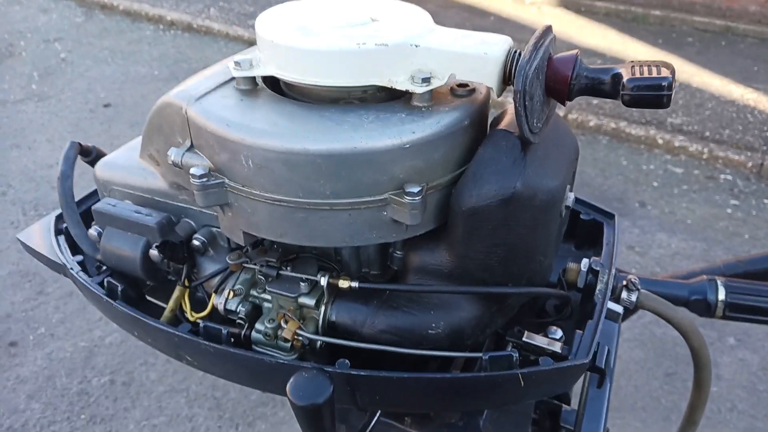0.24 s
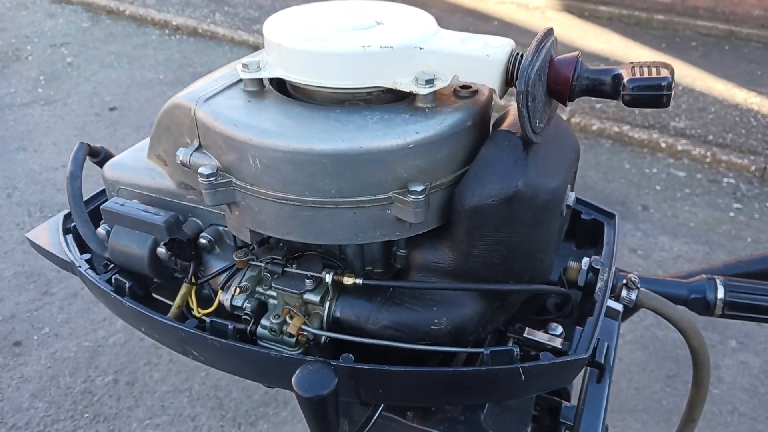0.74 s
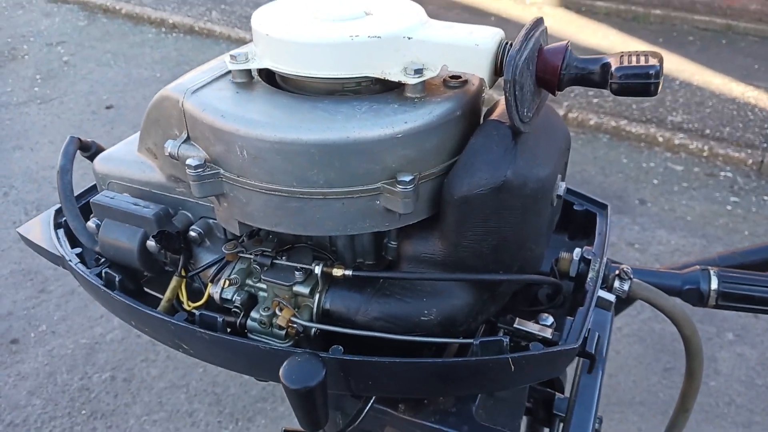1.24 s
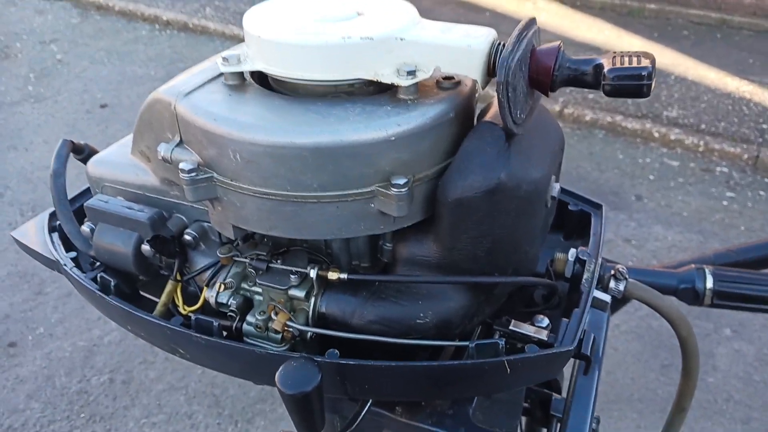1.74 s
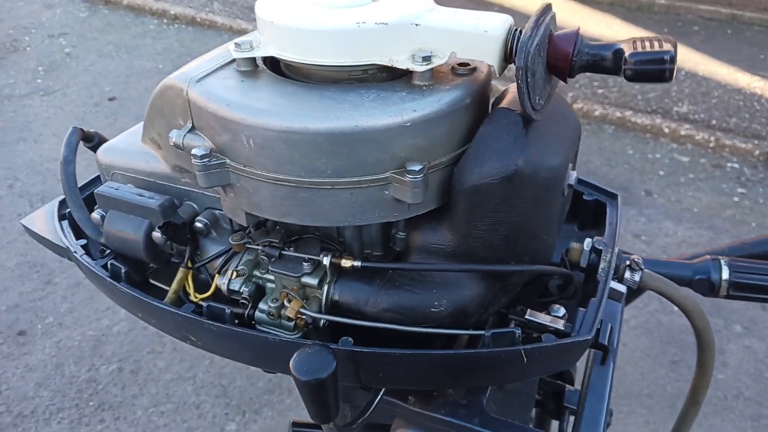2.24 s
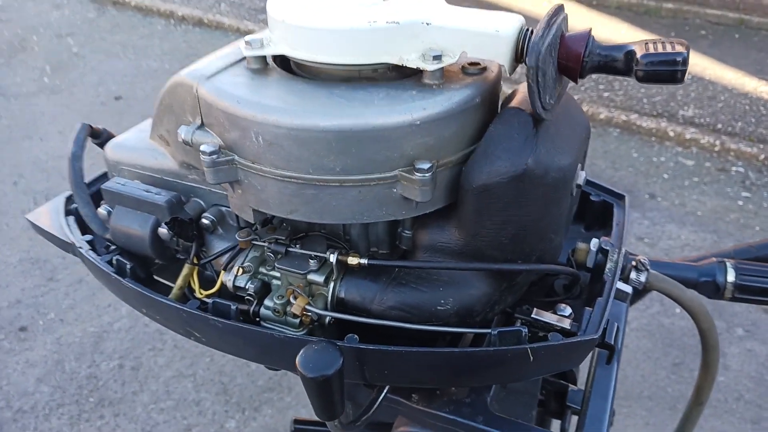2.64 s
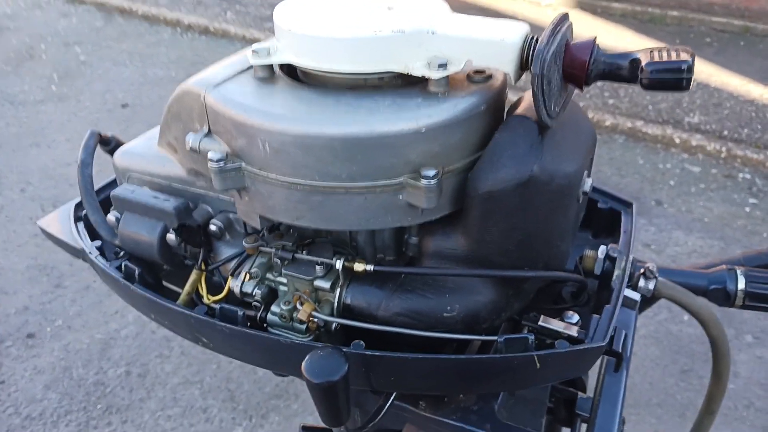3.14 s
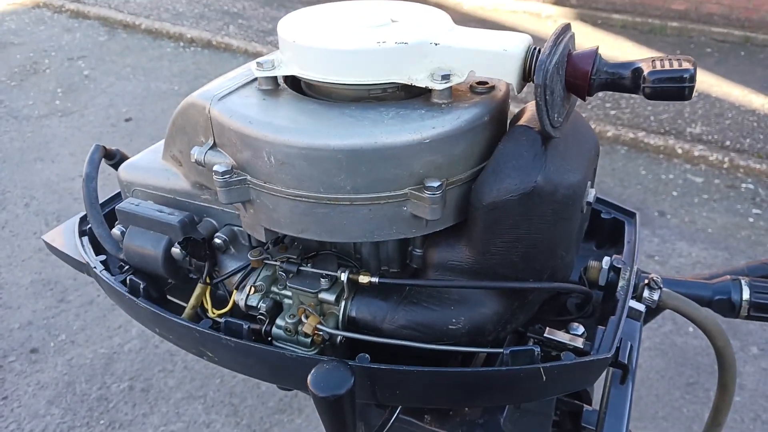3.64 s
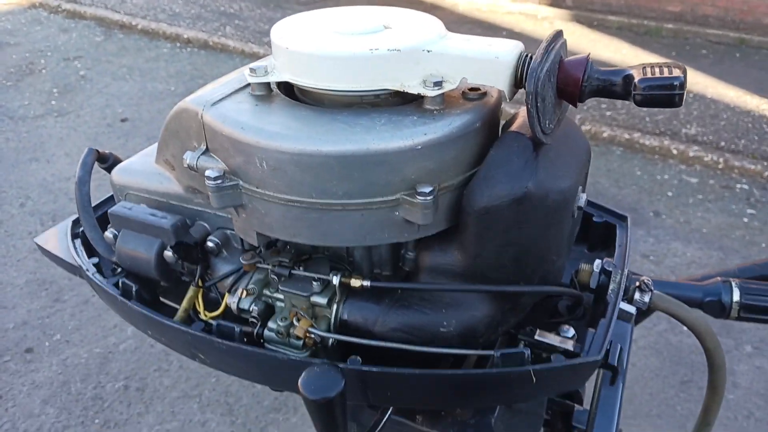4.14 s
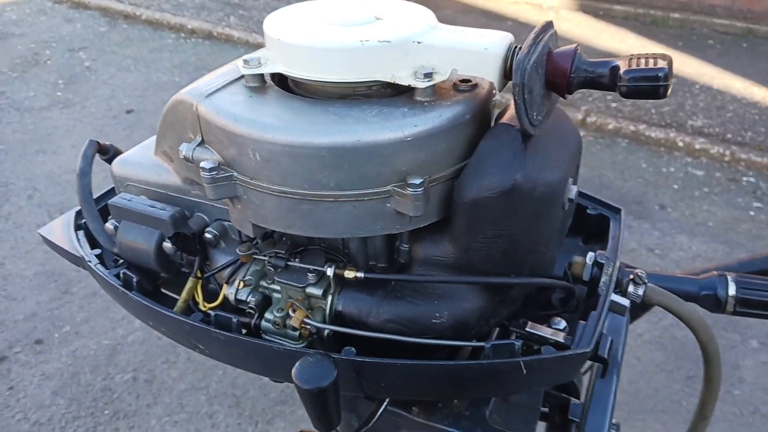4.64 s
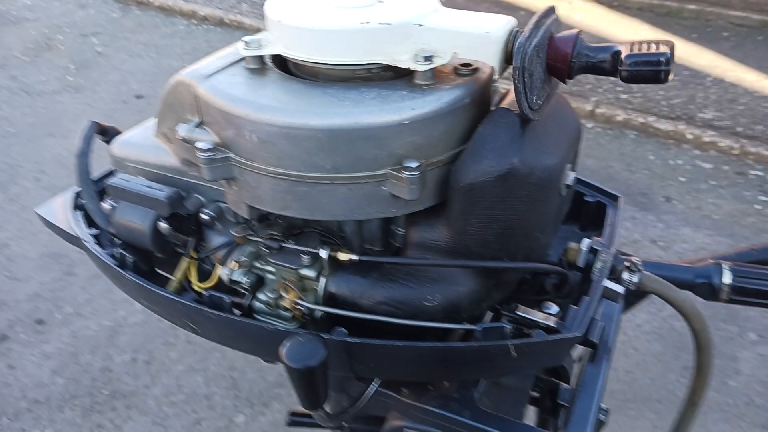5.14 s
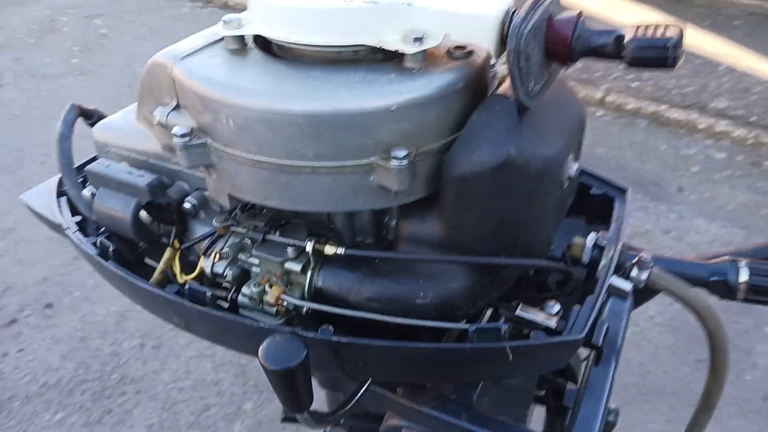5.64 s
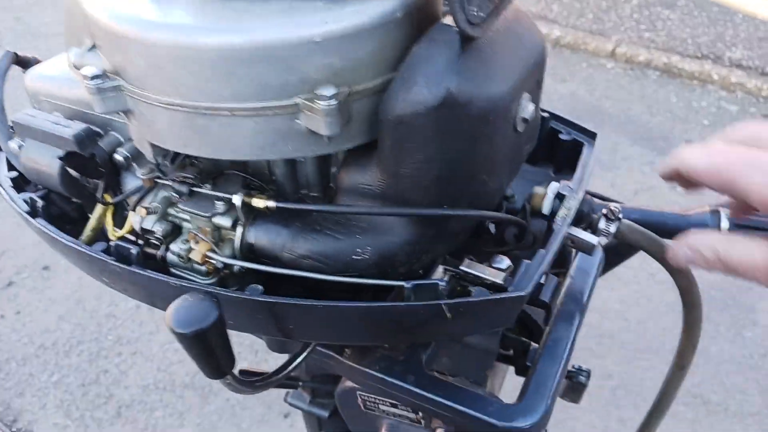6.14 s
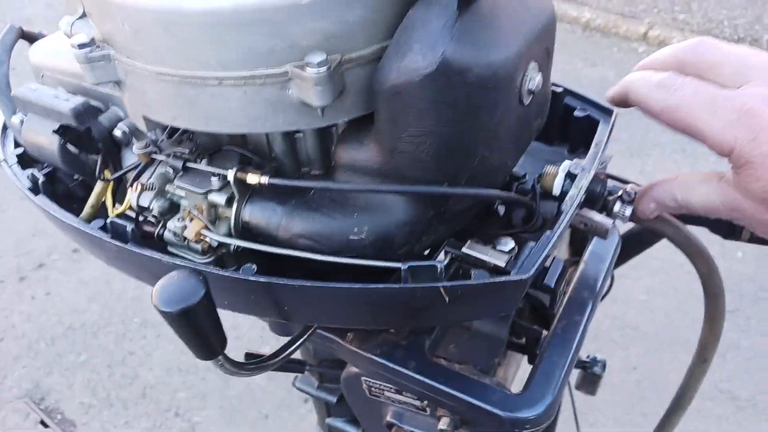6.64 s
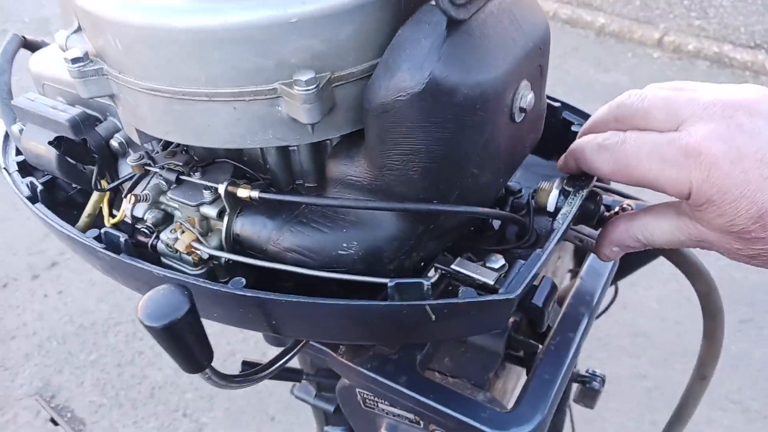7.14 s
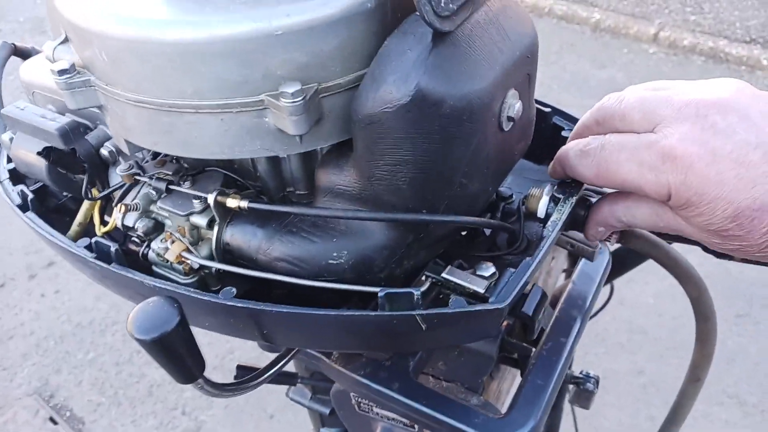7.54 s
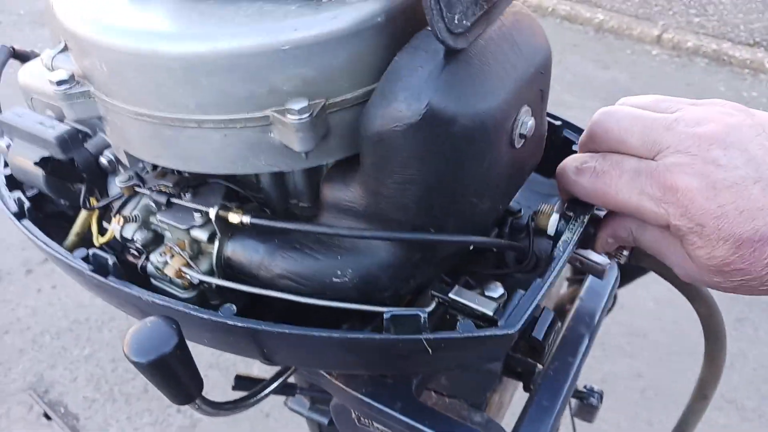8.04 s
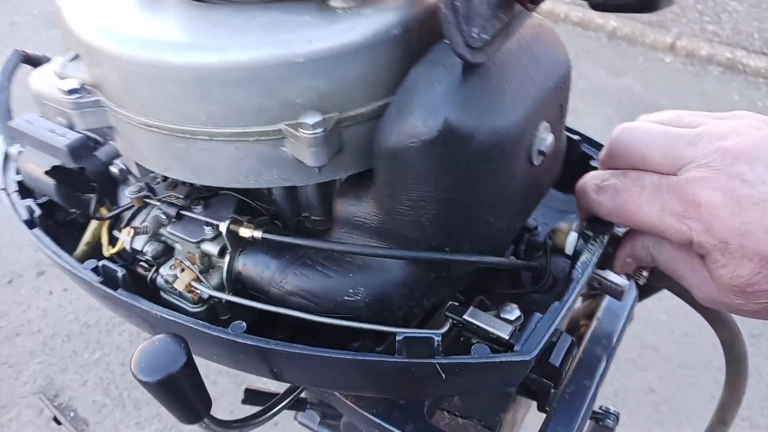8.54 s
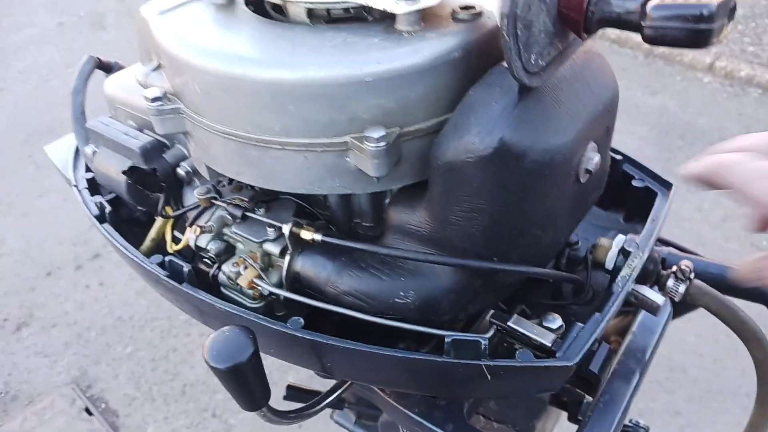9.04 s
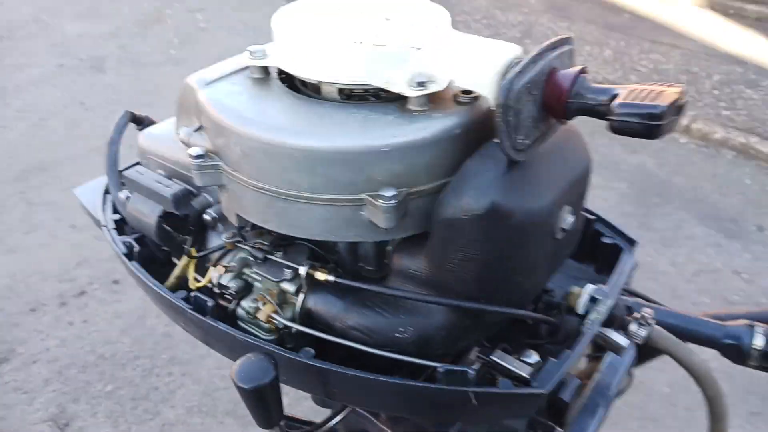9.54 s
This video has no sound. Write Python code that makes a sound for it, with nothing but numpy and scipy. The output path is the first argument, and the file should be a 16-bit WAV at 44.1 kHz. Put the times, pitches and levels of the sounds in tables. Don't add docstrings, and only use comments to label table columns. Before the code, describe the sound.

A little air-cooled boat engine ticks over right in front of the microphone, loud and dry, with uneven cracking pops, chattering metal and airy fan noise. Low wind rumble stays beneath it. The pace hardly changes until the ignition is cut near eight seconds; the flywheel then coasts down through slowing puffs and a thin scrape, the piston knocks to rest, and wind flutter and tiny ticks remain over a faint street.

```python
import sys
import numpy as np
from scipy import signal
from scipy.fft import rfft, irfft, next_fast_len
from scipy.io import wavfile
from scipy.ndimage import uniform_filter1d

SR = 44100
rng = np.random.default_rng(int(sys.argv[2]) if len(sys.argv) > 2 else 0)


def amplitude_ratio(level_db):
    exponent = np.asarray(level_db, float) / 20
    return 10 ** exponent


def transcribe(u):
    v = np.clip(np.atleast_2d(u).T, -1, 1)
    q = np.round(v * 32767).astype(np.int16)
    wavfile.write(sys.argv[1], SR, q)


N = 431296

# start_s, bang_peak_db
BURNS_EARLY = [(0.108, -4), (0.2484, -6.5), (0.3895, -8), (0.5322, -7.5), (0.6454, -8), (0.8144, -9.5),
               (0.9567, -6), (1.101, -8), (1.2435, -6.5), (1.3564, -9), (1.47, -8.5), (1.586, -7.5),
               (1.6424, -9), (1.7563, -6.5), (1.8969, -8.5), (2.0114, -7), (2.1253, -7), (2.2692, -6),
               (2.412, -7.5), (2.525, -8.5), (2.6948, -6.5), (2.8329, -8.5), (2.9439, -8.5), (3.115, -8),
               (3.2587, -6), (3.4017, -6), (3.5185, -7.5), (3.6055, -8), (3.7811, -5.5)]
# start_s, bang_peak_db
BURNS_LATE = [(3.9233, -6.5), (4.0396, -6), (4.2133, -6), (4.3565, -7), (4.4983, -7), (4.6442, -4.5),
              (4.7856, -8.5), (4.8993, -6), (5.0411, -9.5), (5.1826, -6), (5.322, -9), (5.468, -6),
              (5.642, -8.5), (5.7866, -8.5), (5.9023, -7.5), (6.0214, -8), (6.167, -7), (6.2834, -7.5),
              (6.4281, -5.5), (6.5432, -5), (6.6863, -7), (6.86, -9.5), (7.0007, -7.5), (7.1703, -8.5),
              (7.3157, -6.5), (7.4617, -8.5), (7.6059, -6), (7.7223, -7.5), (7.8391, -7), (7.957, -7)]
# start_s, bang_peak_db
HALF_BURNS = [(0.219, -12), (0.6733, -7.5), (0.786, -8), (0.9282, -9), (1.071, -13.5), (1.2727, -13.5),
              (1.3005, -13), (1.3283, -12.5), (1.729, -17), (1.9848, -8), (2.2406, -9.5), (2.3822, -8.5),
              (2.5532, -8), (2.666, -10.5), (2.972, -9), (3.1426, -14.5), (3.229, -13.5), (3.6342, -8.5),
              (4.068, -10.5), (4.384, -13), (4.757, -13.5), (4.9276, -11.5), (5.07, -16), (5.155, -10.5),
              (5.3512, -10.5), (5.4956, -9), (6.257, -11), (6.7144, -9), (7.1427, -8)]
# pitch_hz, left_db, right_db, t60_s, delay_s
EXHAUST_MODES = [(600, -15.5, -8.5, 0.0091, 0.00025), (1315, 0.5, -5, 0.0088, 0.00017),
                 (163.6, -19, -16, 0.13, 0.00012), (213, -13, -11, 0.031, 0.00025),
                 (433.3, -8.5, -6, 0.048, 0.00013), (741, -17.5, -17, 0.18, 0.00039),
                 (1022, -9.5, -17, 0.053, 0.00036), (1259, -8, -18.5, 0.053, 0.00032),
                 (1483, -22.5, -20.5, 0.01, 0.0002), (309, -2.5, -3, 0.012, 0.004537),
                 (1800, -1, -26.5, 0.056, 0.0039), (2892, -5, -26.5, 0.079, 0.00193)]
# pitch_hz, left_db, right_db
JET_SPECTRUM = [(800, -34.5, -37), (2500, 8.5, -1.5), (4500, 6, -10.5), (5190, -2, 3.5), (6960, 2.5, -15.5),
                (10400, -4, -15), (12000, -0.5, -13.5), (15000, -0.5, -18)]
# pitch_hz, width_hz, level_db
PIPE_MODES = [(64, 30, 4), (165, 30, -3), (255, 60, -1), (440, 60, -8)]
# pitch_hz, width_hz, left_db, right_db, left_lead_ms
CASING_MODES = [(1474, 59.5, 4, -2, 0.19), (1794, 210, 2.5, -5, .11), (1915, 143, 4.5, -2.5, 0.049),
                (2152, 83, 3.5, 0.5, .05), (2516, 82, -1, -36.5, .07), (2685, 196, -4.5, -46, .2),
                (3066, 98, -7, -14.5, 0.56), (3328, 16, -3, -18.5, 0.38), (3420, 20, -12, -16.5, .2),
                (3890, 287, -11, -20, .25)]
# pitch_hz, left_db_per_hz, right_db_per_hz
FAN_SPECTRUM = [(60, -26, -24), (150, -18, -16), (330, -15, -14), (480, -8, -8), (830, -17, -17),
                (1500, -6, -12), (2200, -5, -11), (3000, -13, -20), (4500, -18, -22), (5500, -23, -27),
                (7400, -22, -29), (8300, -25, -39), (9800, -29, -37), (15700, -27, -38)]
# pitch_hz, width_hz, lift_db
SHROUD_MODES = [(5470, 500, -3), (6190, 180, 7), (7100, 410, 1.5), (9650, 740, -4), (11740, 920, 5)]
# start_s, peak_db, t60_s
KNOCKS = [(8.53, -32, 0.046), (8.613, -28.5, 0.049), (8.637, -31.5, 0.079), (8.716, -35, 0.051),
          (8.745, -36, .05), (8.778, -39, 0.073), (8.845, -50, 0.035), (8.861, -32, 0.075),
          (8.885, -52, 0.063), (8.974, -41, 0.07), (9.065, -54, 0.064)]
# start_s, peak_db, centre_hz
TICKS = [
    (9.03, -60, 12500),
    (9.111, -62, 12500),
    (9.38, -61, 12000),
    (9.435, -50, 2400),
    (9.551, -49, 12500),
    (9.638, -59, 6540),
    (9.776, -54, 2200),
]
# start_s, peak_db
SLAPS = [(8.96, -28), (8.986, -30), (9.094, -30), (9.143, -27), (9.184, -29), (9.208, -28), (9.264, -20.5),
         (9.299, -25), (9.328, -19.5), (9.388, -18), (9.405, -20), (9.412, -12), (9.436, -22), (9.463, -10),
         (9.484, -20), (9.513, -29), (9.53, -22), (9.538, -14), (9.553, -14), (9.574, -24), (9.586, -23),
         (9.594, -23), (9.616, -42), (9.699, -38.5)]
# centre_s, level_db, left_minus_right_db, half_length_s
GUSTS = [(0.0, -26, -17, 0.07), (0.588, -46, -28, 0.089), (1.195, -32, -7, .17), (1.652, -31.5, -30, 0.19),
         (2.007, -23, -35, 0.079), (2.167, -41, -3, .06), (2.4, -32, -11, 0.061), (3.14, -50, -19, .1),
         (4.886, -49, 3, 0.23), (5.49, -36, -22, 0.062), (5.78, -30, -12, 0.052), (6.932, -53, -18, .1),
         (8.497, -36.5, 3, 0.19), (8.952, -40.5, 24, .05), (9.168, -35, 31, 0.044),
         (9.32, -31.5, 23, 0.055), (9.457, -25.5, 20, 0.06), (9.54, -26, 33, .03), (9.61, -30, 16, .025)]
# pitch_hz, left_db, right_db
STREET_SPECTRUM = [(100, -11.5, -4.5), (300, -5, -12.5), (600, -9, -12), (1000, 0.5, -18),
                   (2400, -7.5, -21.5), (3200, -23, -33.5), (5500, -17, -25.5), (9900, -28.5, -35.5),
                   (12900, -24, -35.5), (15500, -21.5, -34.5)]
# pitch_hz, likeness_0_to_1
LIKENESS = [(60, .8), (200, .95), (800, .9), (1300, .6), (2600, .35), (16000, .25)]

IDLE_TURNS_PER_S = 35
SURGE_S = .00006
COAST_TURNS, COAST_S, COAST_POWER = 18.7, 1.298, .38
STALL_S, STALL_DB_PER_S = 8.86, 97
FULL_JET_DB, FULL_JET_SLOPE = -28.5, 1.4
HALF_JET_DB, HALF_JET_SLOPE = -35.5, 2.3
RATTLE_DB, FAN_DB, PUFF_DB = -22, -33, -22
RATTLE_LAW, FAN_LAW, PUFF_LAW, LIFT_LAW = 0.62, 1.6, .55, 0.36
RATTLE_GIVES = 0.11
PUFF_NARROWS = .9
LIFT_FAR_DB, LIFT_NEAR_DB, LIFT_FROM_S, LIFT_TO_S = -1, 2.5, 3.2, 5.2
LEAN_S, LEAN_TAKES_S, LEAN_LEFT_DB = 5.6, .9, 0.5
LEFT_LEAD_S = .0002
BREEZE_DB, LULL_DB, LULL_S = -37, -47.5, 8.8
SLAP_MS, SHARP_SLAP_MS, SHARPENS_S = 0.67, 0.45, 9.36
STREET_DB = -67
TOP_CUT_HZ = 16050


def rms_one(x):
    return x / np.sqrt(np.mean(x ** 2) + 1e-20)


def butter(x, order, hz, kind="low"):
    return signal.sosfilt(signal.butter(order, hz, kind, fs=SR, output="sos"), x)


def at_hz(points, hz):
    point_hz, *columns = np.transpose(points)
    return np.array([np.interp(np.log(hz), np.log(point_hz), c) for c in columns])


def later(x, delay_s):
    return np.roll(x, round(delay_s * SR))


def ramp(start_s, length_s):
    return np.clip((np.arange(N) / SR - start_s) / length_s, 0, 1)


def drift(rate_hz):
    r = np.exp(-2 * np.pi * rate_hz / SR)
    slow = signal.lfilter([1], [1, -2 * r, r * r], rng.standard_normal(N + SR))
    return rms_one(slow[SR:])


def clicks(start_s, heights):
    out = np.full(N, 1e-18)
    at = np.round(np.asarray(start_s) * SR).astype(int)
    np.add.at(out, np.clip(at, 0, N - 1), heights)
    return out


def resonance(x, hz, width_hz):
    r = np.exp(-np.pi * width_hz / SR)
    poles = [1, -2 * r * np.cos(2 * np.pi * hz / SR), r * r]
    return signal.lfilter(np.array([1, 0, -1]) * (1 - r * r) / 2, poles, x)


def swell(x, rise_s, t60_s):
    a, r = np.exp(-1 / (rise_s * SR)), amplitude_ratio(-60 / (t60_s * SR))
    return signal.lfilter([1], [1, -r], signal.lfilter([1 - a], [1, -a], x))


def stereo_noise(spectrum, peaks=()):
    size = next_fast_len(N)
    hz = np.maximum(np.arange(size // 2 + 1) * SR / size, 1)
    left, own = rfft(rng.standard_normal((2, size)))
    alike = at_hz(LIKENESS, hz)[0]
    shared = left * np.exp(-2j * np.pi * hz * LEFT_LEAD_S)
    right = alike * shared + np.sqrt(1 - alike ** 2) * own
    lift_db = sum(db / (1 + (2 * (hz - top_hz) / width_hz) ** 2) for top_hz, width_hz, db in peaks)
    gain = amplitude_ratio(at_hz(spectrum, hz) + lift_db)
    return rms_one(irfft(gain * np.array([left, right]), size)[:, :N])


def firings():
    rows = [(s, db, FULL_JET_DB + FULL_JET_SLOPE * (db + 7)) for s, db in BURNS_EARLY + BURNS_LATE]
    rows += [(s, db, HALF_JET_DB + HALF_JET_SLOPE * (db + 8.5)) for s, db in HALF_BURNS]
    return np.transpose(sorted(rows))


def crank():
    start_s, bang_db, _ = firings()
    port_s = list(start_s[0] - np.arange(5, 0, -1) / IDLE_TURNS_PER_S)
    charge_db = [-99] * 5
    for start, gap_s, db in zip(start_s, np.diff(start_s), bang_db):
        count = max(round(gap_s * IDLE_TURNS_PER_S), 1)
        k = np.arange(count)
        port_s += list(start + gap_s * k / count - SURGE_S * count * k * (count - k))
        charge_db += [db] + [-99] * (count - 1)
    coasting = np.arange(int(COAST_TURNS) + 1)
    port_s += list(start_s[-1] + COAST_S * (1 - (1 - coasting / COAST_TURNS) ** COAST_POWER))
    charge_db += [bang_db[-1]] + [-99] * (len(coasting) - 1)
    turns = np.interp(np.arange(N) / SR, port_s, np.arange(len(port_s)))
    return turns, np.array(charge_db)


def levels():
    left = 1 - ramp(BURNS_LATE[-1][0], COAST_S)
    speed_db = 20 * (1 / COAST_POWER - 1) * np.log10(left + 1e-3)
    stall_db = -STALL_DB_PER_S * ramp(STALL_S, 1)
    rattle_db = RATTLE_DB + RATTLE_LAW * speed_db - RATTLE_GIVES * speed_db ** 2 + stall_db
    fan_db = FAN_DB + FAN_LAW * speed_db + stall_db
    view = ramp(LIFT_FROM_S, LIFT_TO_S - LIFT_FROM_S)
    lift_db = LIFT_FAR_DB + (LIFT_NEAR_DB - LIFT_FAR_DB) * view + LIFT_LAW * speed_db
    return rattle_db, fan_db, lift_db, PUFF_DB + PUFF_LAW * speed_db


def bangs():
    start_s, bang_db, _ = firings()
    out = np.zeros((2, N))
    chance = rng.standard_normal((len(start_s), len(EXHAUST_MODES)))
    for (hz, left_db, right_db, t60_s, delay_s), own in zip(EXHAUST_MODES, chance.T):
        r, w = amplitude_ratio(-60 / (t60_s * SR)), 2 * np.pi * hz / SR
        spread_db = min(1.0 + hz / 1200, 2.2)
        front = clicks(start_s + delay_s, amplitude_ratio(bang_db + spread_db * own))
        rung = signal.lfilter([1, -r * np.cos(w)], [1, -2 * r * np.cos(w), r * r], front)
        out += rung * amplitude_ratio([[left_db], [right_db]])
    out[1] = later(out[1], LEFT_LEAD_S)
    return butter(out, 2, 2600)


def jet():
    start_s, _, jet_db = firings()
    ms = np.arange(-200, 201) / SR * 1000
    first = swell(clicks(start_s + .0003, amplitude_ratio(jet_db + 7.5)), 0.0018, 0.039)
    peak_clicks = clicks(start_s + 0.0031, amplitude_ratio(jet_db + 11.5))
    peak = signal.oaconvolve(peak_clicks, np.exp(-(ms / 1.14) ** 2), "same")
    tail = swell(clicks(start_s + 0.0013, amplitude_ratio(jet_db - 8)), 0.0027, 0.35)
    return (first + peak + tail) * stereo_noise(JET_SPECTRUM)


def puffs(turns, charge_db, puff_db):
    angle = (turns + .5) % 1 - .5
    turn = np.round(turns).astype(int)
    chance = amplitude_ratio(1.1 * rng.standard_normal(400)[:len(charge_db)])
    unburnt = np.clip(1 - amplitude_ratio(charge_db + 13), 0, 1) * chance
    stretch = amplitude_ratio(PUFF_NARROWS * (puff_db - PUFF_DB))

    def bump(centre, width):
        return np.exp(-((angle - centre) / width / stretch) ** 2)

    flow = unburnt[turn] * (.75 * bump(.08, .036) - bump(.163, .03) - .25 * bump(.43, .04))
    column = sum(amplitude_ratio(db) * resonance(flow, hz, width_hz) for hz, width_hz, db in PIPE_MODES)
    out = butter(amplitude_ratio(puff_db) * (flow + column), 2, 40, "high")
    return np.array([amplitude_ratio(-1.2) * out, amplitude_ratio(1.2) * later(out, LEFT_LEAD_S)])


def rattle(turns, rattle_db, lift_db):
    beat_db = 1.5 * np.cos(2 * np.pi * (turns - .76)) + 0.75 * np.cos(4 * np.pi * (turns - .74))
    sizes = amplitude_ratio(1.82 * np.minimum(rng.exponential(1, (2, N)), 5)) * rng.choice([-1, 1], (2, N))
    grains = sizes * (rng.random((2, N)) < 6000 / SR)
    teeth = np.interp(turns % 1, np.linspace(0, 1, 600), rng.standard_normal(600))
    strikes = amplitude_ratio(beat_db) * (rms_one(grains) + 0.16 * teeth * [[1], [0]])
    out = np.zeros((2, N))
    for k, (hz, width_hz, left_db, right_db, lead_ms) in enumerate(CASING_MODES):
        gain = amplitude_ratio(1.36 * drift(59) + lift_db * (k == 0))
        near, far = resonance(strikes * gain, hz, width_hz)
        alike = .85 if hz < 2600 else .45
        right = alike * later(near, lead_ms / 1000) + np.sqrt(1 - alike ** 2) * far
        out += (-1) ** k * np.array([near * amplitude_ratio(left_db), right * amplitude_ratio(right_db)])
    return amplitude_ratio(rattle_db + 2.5) * rms_one(butter(out, 3, [1250, 4600], "band"))


def fan(turns, fan_db):
    slowness = 1 - np.clip(np.gradient(turns) * SR / IDLE_TURNS_PER_S, 0, 1)
    breath_db = 1.0 * np.cos(2 * np.pi * (turns - .65)) + 1.0 * drift(41)
    air = stereo_noise(FAN_SPECTRUM, SHROUD_MODES)
    # pitch_hz, width_hz, share
    openings = ((4370, 250, 0.22), (6230, 370, -0.54), (8700, 420, 0.22), (7250, 500, 0.2),
                (12400, 820, 0.26))
    opened = sum(share * resonance(air, hz, width_hz) for hz, width_hz, share in openings)
    air = air + ramp(LEAN_S, LEAN_TAKES_S) * opened
    dull = butter(air, 1, [500, 1200], "band")
    bright = butter(air, 2, 8500, "high")
    scrape = slowness * (amplitude_ratio(8.0) * dull + amplitude_ratio(6.0 * drift(90)) * bright)
    return amplitude_ratio(fan_db + 10 + breath_db) * (air + scrape)


def knocks():
    blows = sum(swell(clicks([s], amplitude_ratio(db + 4.5)), 0.0008, t60_s) for s, db, t60_s in KNOCKS)
    body = butter(blows * rng.standard_normal((2, N)), 2, [500, 4500], "band")
    # pitch_hz, level_db
    modes = ((620, 14.5), (1470, 15), (2000, 17), (2530, 1), (940, 10), (3960, -9), (5770, -6))
    rings = sum(amplitude_ratio(db) * resonance(body, hz, 106) for hz, db in modes)
    return (amplitude_ratio(-11) * body + rings) * amplitude_ratio([[2], [-2]])


def ticks():
    grit = rng.standard_normal(N)
    out = np.zeros(N)
    for start_s, db, hz in TICKS:
        burst = swell(clicks([start_s], amplitude_ratio(db + 2.5)), 0.00016, .012) * grit
        out += resonance(burst, hz, 0.37 * hz)
    return out * amplitude_ratio([[3], [-8]])


def slaps():
    out, ms = np.zeros(N), np.arange(-200, 200) / SR * 1000
    for (start_s, db), chance in zip(SLAPS, rng.random((len(SLAPS), 3))):
        width_ms, cusp = (SLAP_MS, .22) if start_s < SHARPENS_S else (SHARP_SLAP_MS, .34)
        delays_s = np.array([.002, 0.00456 + 0.00217 * chance[0], 0.0084 + .003 * chance[1]])
        volley = clicks(start_s + delays_s, [1, -.6, .3])
        spike = np.exp(-.5 * (ms / width_ms) ** 2) + cusp * np.exp(-np.abs(ms) / (0.76 * width_ms))
        at = round(start_s * SR)
        piece = np.convolve(volley[at - 200:at + 1200], spike, "same")
        out[at - 200:at + 1200] += amplitude_ratio(db + 5) * np.sign(chance[2] - .4) * piece
    return butter(butter(out, 2, 110, "high"), 4, 2000) * amplitude_ratio([[0], [-30]])


def wind():
    out, after_stop = [], ramp(LULL_S, .1)
    coarse = np.arange(0, N, 64)
    breeze = amplitude_ratio(BREEZE_DB + (LULL_DB - BREEZE_DB) * after_stop)
    for side in (1, -1):
        eddies = rng.standard_normal(N)
        low = butter(eddies, 2, [45, 100], "band")
        upper = butter(eddies, 2, [100, 260], "band")
        rustle = butter(eddies, 2, [300, 900], "band")
        gusts = sum(amplitude_ratio(db + min(side * lean_db, 3)) * np.exp(-((coarse / SR - s) / half_s) ** 2)
                    for s, db, lean_db, half_s in GUSTS)
        gain_db = 20 * np.log10(np.interp(np.arange(N), coarse, gusts) + breeze)
        lumps = low + upper * np.maximum(0.17 * after_stop, amplitude_ratio(0.54 * (gain_db + 16.5)))
        lumps = lumps + 0.16 * after_stop * amplitude_ratio(4.3 * drift(60)) * rustle
        even = lumps / np.sqrt(uniform_filter1d(lumps ** 2, size=2500) + 1e-12)
        out.append(amplitude_ratio(gain_db + 3.7 * drift(20)) * even)
    return butter(np.array(out), 2, 260)


def street():
    return amplitude_ratio(STREET_DB) * stereo_noise(STREET_SPECTRUM)


def scene():
    rattle_db, fan_db, lift_db, puff_db = levels()
    turns, charge_db = crank()
    exhaust = bangs() + puffs(turns, charge_db, puff_db)
    top = jet() + rattle(turns, rattle_db, lift_db) + fan(turns, fan_db)
    lean_db = LEAN_LEFT_DB * ramp(LEAN_S, LEAN_TAKES_S) * [[.5], [-.5]]
    return exhaust + top * amplitude_ratio(lean_db) + knocks() + ticks() + slaps() + wind() + street()


def band_limit(x):
    return signal.sosfilt(signal.butter(12, 17060, fs=SR, output="sos"), x)


def record(dry):
    rounded = .97 * np.tanh(butter(dry, 3, 42, "high") / .97)
    top_cut = signal.cheby2(22, 80, TOP_CUT_HZ, fs=SR, output="sos")
    return band_limit(signal.sosfilt(top_cut, rounded))


dry = scene()
out = record(dry)
transcribe(out)
```